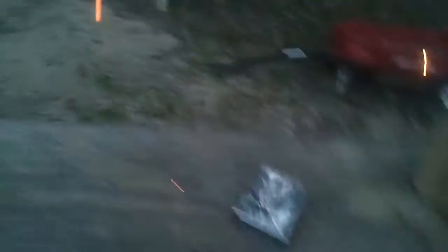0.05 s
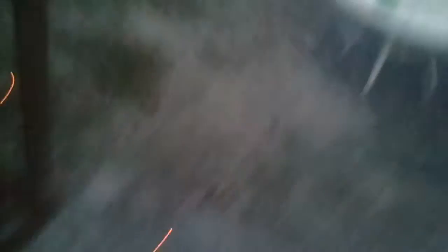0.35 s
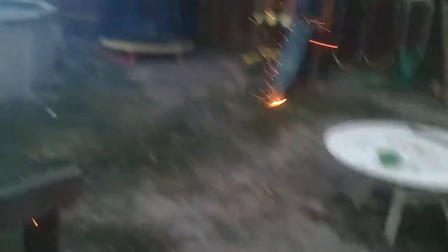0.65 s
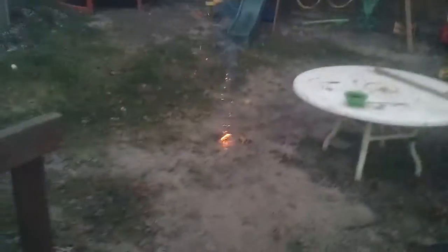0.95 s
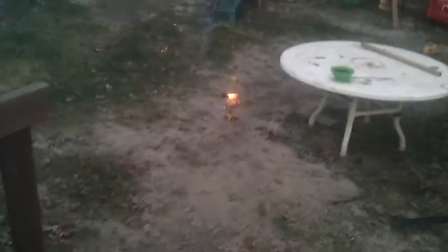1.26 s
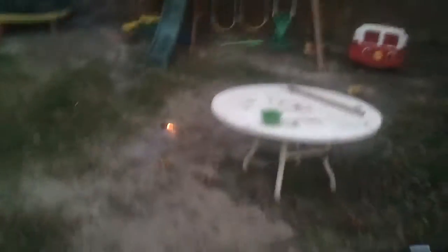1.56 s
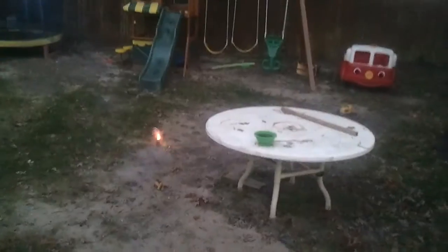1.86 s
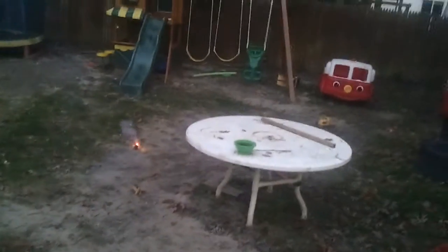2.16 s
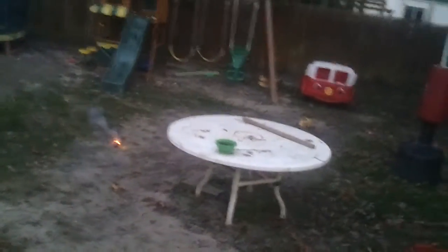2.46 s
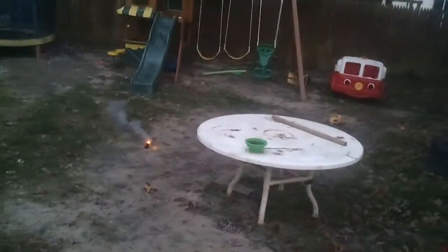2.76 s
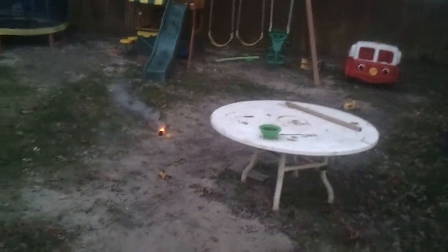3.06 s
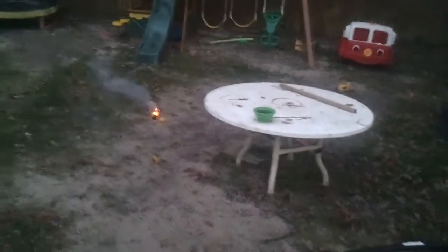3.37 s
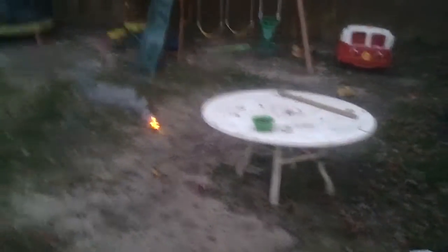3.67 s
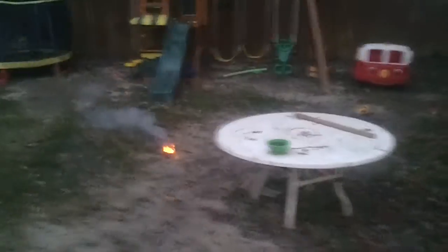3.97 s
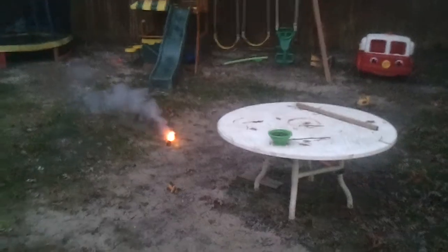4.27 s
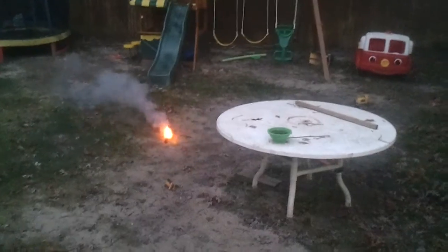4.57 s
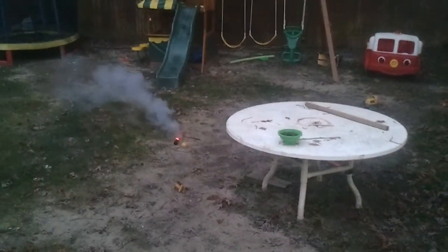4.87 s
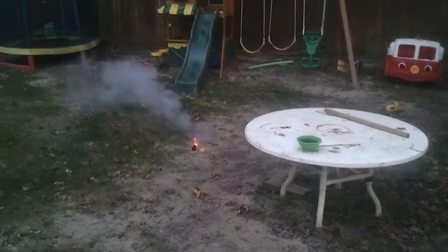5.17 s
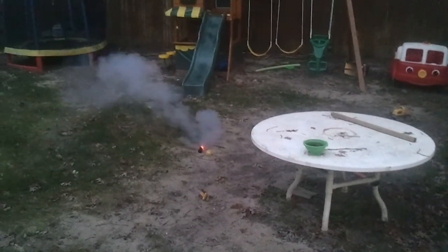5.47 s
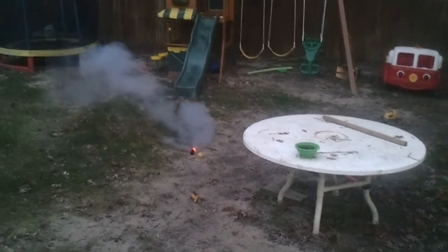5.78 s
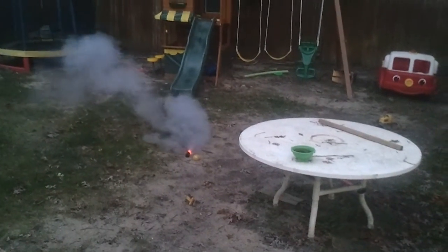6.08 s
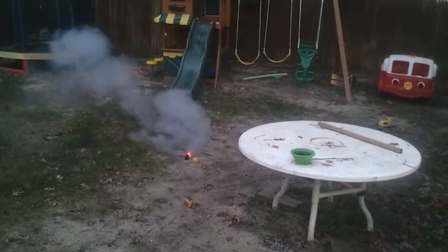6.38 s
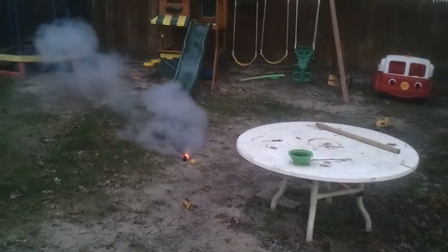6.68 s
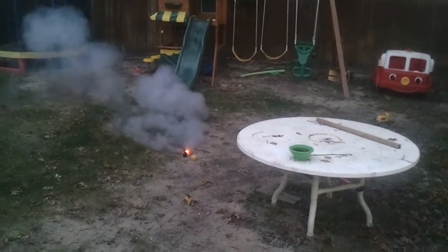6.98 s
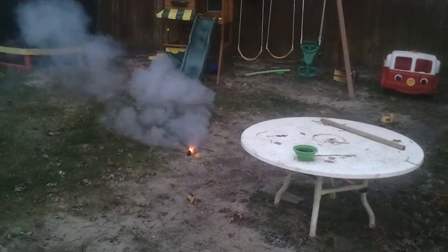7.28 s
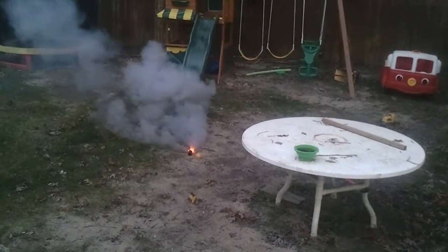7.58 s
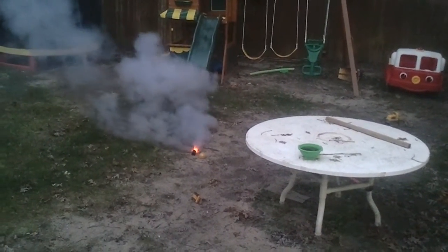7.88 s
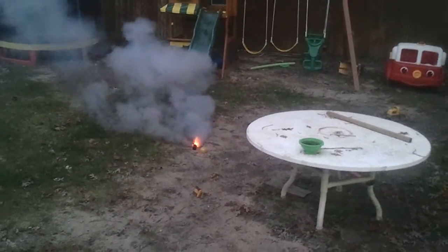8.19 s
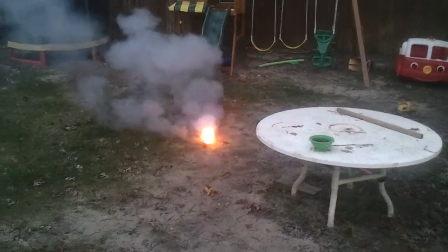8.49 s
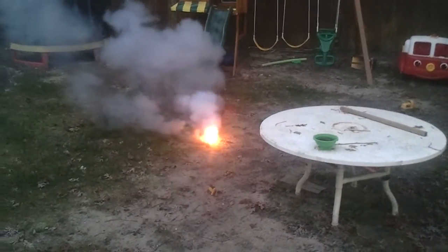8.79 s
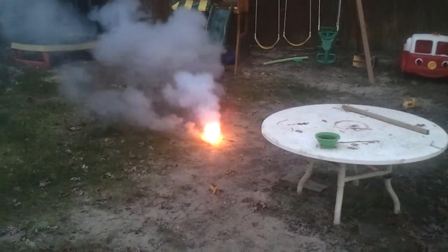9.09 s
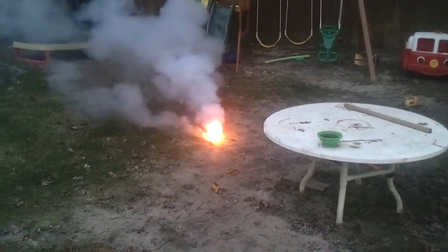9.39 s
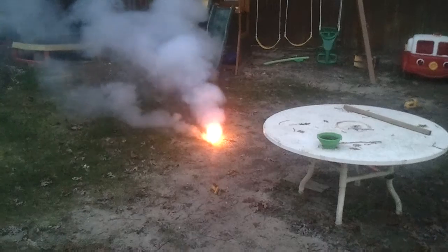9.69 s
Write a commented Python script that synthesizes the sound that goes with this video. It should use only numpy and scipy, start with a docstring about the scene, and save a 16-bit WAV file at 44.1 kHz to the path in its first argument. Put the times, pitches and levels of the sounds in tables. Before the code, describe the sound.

A fuse fizzes, fingers knock on the microphone, then a smoke bomb hisses loudly and settles into a soft flame as crickets trill.

```python
"""A homemade smoke device vents gas in a loud hiss as its charge catches, then settles into a flame.
Before that, its fuse fizzes past the camera and lands on the dirt, and the charge smoulders.
Fingers knock and rub on the camera body; the hardest knocks overload its microphone.
Crickets trill steadily in the backyard at dusk."""
import sys
import numpy as np
from scipy import signal
from scipy.fft import rfft, irfft
from scipy.io import wavfile
from scipy.ndimage import map_coordinates

SR = 44100
rng = np.random.default_rng(int(sys.argv[2]) if len(sys.argv) > 2 else 0)


def inscribe(sig):
    """Save sig as 16-bit PCM at rate SR to the path in sys.argv[1].

    A 1-D sig is mono; a 2-D sig holds one channel per row.
    Samples are clipped to [-1, 1] before scaling.
    """
    pcm = np.round(np.clip(np.atleast_2d(sig).T, -1, 1) * 32767)
    wavfile.write(sys.argv[1], SR, pcm.astype(np.int16))


N = 438354
TIME = np.arange(N) / SR


def amp(db):
    """Decibels to gain."""
    return 10 ** (np.asarray(db) / 20)


def unit(x):
    """Scale to rms 1."""
    return x / np.sqrt(np.mean(x ** 2) + 1e-20)


def curve(rows):
    """Breakpoints interpolated to every sample."""
    return np.interp(TIME, *np.transpose(rows))


def noise(spectrum):
    """Noise of rms 1 with the given spectral density, falling steeply above the last point."""
    hz = np.fft.rfftfreq(N, 1 / SR) + 1
    points_hz, db = np.transpose(spectrum)
    gain = amp(np.interp(np.log(hz), np.log(points_hz), db)) / (1 + (hz / points_hz[-1]) ** 20)
    return unit(irfft(rfft(rng.standard_normal(N)) * gain, N))


def flutter(rate_hz):
    """Random wavering of rms 1, rolling off above rate_hz."""
    hz = np.fft.rfftfreq(N, 1 / SR)
    gain = hz / (hz + 2) / (1 + (hz / rate_hz) ** 2)
    return unit(irfft(rfft(rng.standard_normal(N)) * gain, N))


def gate(start_s, attack_s, stop_s, release_s):
    """Linear attack, hold at 1, linear release."""
    return np.clip((TIME - start_s) / attack_s, 0, 1) * np.clip(1 - (TIME - stop_s) / release_s, 0, 1)


def swells(rows):
    """Gain of rounded, symmetric swells, summed in power."""
    return np.sqrt(sum((amp(db) / np.cosh(np.minimum(abs(TIME - peak_s) / width_s, 20))) ** 2
                       for peak_s, width_s, db in rows))


def ring(modes, t, rise_s=0.00028):
    """Damped modes struck at once, peak 1."""
    sound = sum(amp(db - 60 * t / t60_s) * np.sin(2 * np.pi * hz * t + k * np.pi / 2)
                for k, (hz, db, t60_s) in enumerate(modes))
    sound *= 1 - np.exp(-(t / rise_s) ** 2)
    return sound / abs(sound).max()


def add(mix, start_s, sound):
    """Mix a sound in at start_s."""
    part = mix[max(round(start_s * SR), 0):][:len(sound)]
    part += sound[:len(part)]


# Yard background: freq_hz, density_db
YARD_SPECTRUM = [(25, -25.5), (60, -7), (130, 0.5), (270, 2), (450, -2), (730, -3), (1100, -4),
                 (1900, -12.5), (2600, -4), (4500, 1), (6500, -22), (7700, -7), (9200, -41.5)]


def yard(level_db=-45):
    """Steady far-off background noise."""
    return amp(level_db) * noise(YARD_SPECTRUM)


# High insect song: freq_hz, density_db
TRILL_SPECTRUM = [(3700, -37), (4100, 1), (4400, 1), (4850, -0.5), (5200, -8), (5900, -15.5), (6500, -39.5)]
# Occasional trills: peak_s, width_s, level_db
TRILL_SWELLS = [(1.44, 0.043, -44), (1.93, 0.1, -30.5), (4.15, .5, -36.5)]


def high_insects(rasp_db=2):
    """Thin, rasping trills just above the crickets in pitch."""
    return noise(TRILL_SPECTRUM) * swells(TRILL_SWELLS) * amp(rasp_db * flutter(90))


# Cricket song: freq_hz, density_db
CRICKET_SPECTRUM = [(3200, -41), (3480, -20), (3660, -7), (3860, 2), (4000, -4), (4200, -10.5), (4600, -22),
                    (5000, -32.5), (5600, -44)]
# Chorus envelope: time_s, level_db
CHORUS_LEVEL = [(0, -32.5), (1.22, -36.5), (1.52, -26), (2.95, -26.2), (3.35, -23.5), (3.7, -27),
                (5, -25.3), (6.5, -26.5), (8.2, -24.7), (9.94, -26.5)]


def crickets(groups=8, mid_pulse_hz=42, pulse_depth=0.49, waver_db=0.46):
    """Trills blur into one shrill band, each group pulsing at its own wing-stroke rate."""
    chorus = np.zeros(N)
    for pace in rng.uniform(.5, 1.5, groups):
        strokes = np.cumsum(mid_pulse_hz * pace * (1 + .1 * flutter(3.3))) / SR
        chorus += noise(CRICKET_SPECTRUM) * (1 + pulse_depth * np.sin(2 * np.pi * strokes))
    return unit(chorus) * amp(curve(CHORUS_LEVEL) + waver_db * flutter(8.6))


# Finger scrape: freq_hz, density_db
SCRAPE_SPECTRUM = [(60, -22), (300, -7), (550, -1.5), (900, -4), (1600, -2.5), (2400, -5.5), (3300, -13.5),
                   (6000, -14), (9000, -44)]
# Slides on the case: start_s, length_s, level_db
FINGER_SLIDES = [(1.16, 0.084, -43.5), (1.368, 0.16, -44.5), (3.513, .1, -30), (3.68, .08, -42)]


def finger_scrape(attack_s=0.0078, release_s=.04, ease_db_per_s=41, grain_db=1.8):
    """Skin drags over plastic in a fine-grained scrape that eases off."""
    pressure = np.zeros(N)
    for start_s, length_s, level_db in FINGER_SLIDES:
        easing = amp(level_db - ease_db_per_s * np.maximum(TIME - start_s, 0))
        pressure += gate(start_s, attack_s, start_s + length_s, release_s) * easing
    grain = amp(grain_db * flutter(400))
    return noise(SCRAPE_SPECTRUM) * pressure * grain


# Upper modes of the plastic case: base_pitch_hz, relative_db, base_t60_s
CASE_MODES = [(3855, 5, 0.0052), (4250, 1, 0.0074), (4777, -2.5, 0.0084), (5430, -11.5, 0.01),
              (6760, -1, 0.003)]
# Lower case modes, heard as a crack: pitch_hz, relative_db, t60_s
CRACK_MODES = [(872, -8.5, 0.0069), (1160, -10, 0.0017), (1710, 6.5, 0.005), (2540, 13.5, 0.0022)]
# Knocks on the camera body: start_s, thud_db, thud_pitch_hz, crack_db, case_db
FINGER_KNOCKS = [ (0.015, -37, 900, -11, -5), (0.535, -15, 840, -25, -23), (0.5471, -14, 315, -12, -8),
                 (.629, -22, 755, -10, 0.5), (1.1569, -18, 695, -26, -21), (1.3259, -26, 260, -24, -32),
                 (1.473, -16, 315, -22, -37), (1.493, -13.5, 332, -13.5, -13.5),
                 (1.5989, -17, 540, -6.5, -8.5), (1.712, -26, 680, -5.5, -4), (1.8948, -21.5, 465, -11, -6),
                 (2.0487, -28.5, 500, -32, -39), (2.154, -27.5, 704, -38, -35),
                 (2.654, -33, 500, -26.5, -23), (3.1304, -23.5, 724, -23, -39),
                 (3.4813, -18, 342, -28, -43), (3.5059, -48, 900, -11.5, -14), (3.5212, -17, 440, -34, -30),
                 (3.668, -29.5, 230, -32, -15), (3.6983, -23.5, 420, -30, -38),
                 (3.9218, -22, 636, -12, -10.5), (3.9249, -5.5, 690, -15, -12),
                 (3.9503, -1.5, 675, -2.5, -2.5), (4.001, 0.5, 600, 1, -6.5),
                 (4.0569, -22.5, 900, -20, -32), (5.5899, -9, 560, -12, -1), (8.229, -9.5, 710, -9.5, -5.5),
                 (8.235, -34, 900, -11.5, -14)]


def knocks(thud_decay_cycles=0.52, hollow_db=-19, hollow_t60_s=.03, tightening_per_db=.011):
    """Damped thud, hollow after-ring, crack and case ring; stiffer spots ring more, and higher."""
    out = np.zeros(N)
    t = np.arange(SR // 20) / SR
    for start_s, thud_db, hz, crack_db, case_db in FINGER_KNOCKS:
        thud = np.sin(2 * np.pi * hz * t) * np.sqrt(t) * np.exp(-hz * t / thud_decay_cycles)
        hollow = amp(hollow_db) * ring([(.6 * hz, 0, hollow_t60_s), (1.3 * hz, 0, hollow_t60_s)], t)
        add(out, start_s - .0006, amp(thud_db) * (thud / abs(thud).max() + hollow))
        pitch_ratio = np.exp(tightening_per_db * (case_db - crack_db))
        crack = amp(crack_db) * ring(CRACK_MODES, t)
        case = amp(case_db) * ring(CASE_MODES, t * pitch_ratio)
        add(out, start_s - .0004, crack + case)
    # The small case radiates little deep bass and no top treble.
    out = signal.sosfilt(signal.butter(2, 150, "high", fs=SR, output="sos"), out)
    return signal.sosfilt(signal.butter(10, 7600, fs=SR, output="sos"), out)


# Fingertip settling: freq_hz, density_db
RUSTLE_SPECTRUM = [(60, -18), (260, 0), (750, -4), (1500, -15.5)]


def finger_rustle(base_db=-32, growth=0.27, rise_s=0.0032, fade_s=0.015):
    """The fingertip settles after each knock; harder thuds leave a stronger rustle."""
    gain = np.zeros(N)
    t = np.arange(SR // 5) / SR
    envelope = (1 - np.exp(-(t / rise_s) ** 2)) * np.exp(-t / fade_s)
    for start_s, thud_db, *_ in FINGER_KNOCKS:
        add(gain, start_s, amp(base_db + growth * thud_db) * envelope)
    return noise(RUSTLE_SPECTRUM) * gain


# Fuse puffs at close range: peak_s, width_s, level_db
FUSE_PUFFS = [(.13, 0.024, -22.5), (.19, 0.042, -16), (.36, 0.045, -22.5), (.48, 0.013, -37)]


def fuse_gain(near_db=-21.5, near_m=.3, throw_s=0.49, flight_s=0.56, speed_m_per_s=6.8):
    """The fuse burns with a few puffs, fades with distance once thrown, and goes out."""
    out_s, fade_s = 1.5, .2
    alight = np.clip(1 - (TIME - out_s) / fade_s, 0, 1)
    distance_m = near_m + speed_m_per_s * np.clip(TIME - throw_s, 0, flight_s)
    return np.hypot(amp(near_db), swells(FUSE_PUFFS)) * alight * near_m / distance_m


# Fuse fizz: freq_hz, density_db
FIZZ_SPECTRUM = [(25, -19.5), (70, -27), (250, -20), (800, -13), (1400, -6), (2000, -13), (2800, -7),
                 (3600, -3), (4500, -2), (5500, -6), (7000, -13.5), (8200, -18), (9200, -56)]
# Echo off the deck as the fuse swings: time_s, lag_ms
DECK_ECHO_LAG = [(0, 0.438), (.2, .44), (.3, 0.32), (.39, .28), (.46, 0.395), (.75, 0.474)]


def fuse(sputter_db=1.5, echo_gain=.58):
    """Sputtering fizz; its echo off the deck sweeps a comb through it as it moves."""
    fizz = noise(FIZZ_SPECTRUM) * amp(sputter_db * flutter(130))
    echo_index = np.arange(N) - curve(DECK_ECHO_LAG) * SR / 1000
    echo = echo_gain * map_coordinates(fizz, [echo_index], order=3)
    return unit(fizz + echo) * fuse_gain()


# Vent edge tones: pitch_hz, relative_db
WHISTLE_TONES = [(5480, -1.5), (6800, -14.5)]
# Whistles under the flame: peak_s, width_s, level_db
WHISTLE_SWELLS = [(8.66, 0.11, -44), (9.38, .08, -45)]


def whistle(waver_hz=45, unsteady_db=3):
    """Faint, unsteady edge tones at the burning vent."""
    tones = sum(amp(db) * np.sin(2 * np.pi * np.cumsum(hz + waver_hz * flutter(90)) / SR)
                for hz, db in WHISTLE_TONES)
    return unit(tones) * swells(WHISTLE_SWELLS) * amp(unsteady_db * flutter(30))


# Open flame: freq_hz, density_db
FLAME_SPECTRUM = [(30, -28.5), (90, -18), (190, -1.5), (330, -3.5), (440, -8.5), (580, 0), (850, -2.5),
                  (1200, -5), (1800, -22), (2900, -2), (5400, -9), (6800, -9), (9000, -46)]


def flame(full_db=-37.5, full_s=8.79, rise_db_per_s=9, flicker_db=0.84):
    """The open flame grows to a soft, flickering roar."""
    level_db = full_db + rise_db_per_s * np.minimum(TIME - full_s, 0)
    return noise(FLAME_SPECTRUM) * amp(level_db + flicker_db * flutter(25))


# Echoes off ground, table and deck rail: lag_ms, gain
REFLECTIONS = [(1.29, 0.032), (5.72, 0.053), (13.3, 0.039), (17.75, 0.042)]


def reflected(x):
    """Direct sound plus early reflections."""
    return x + sum(gain * np.roll(x, round(lag_ms * SR / 1000)) for lag_ms, gain in REFLECTIONS)


# Jet surges, strongest as the charge flares: peak_s, width_s, strength_db
JET_SURGES = [(.92, 0.11, -44.5), (1.44, 0.032, -38), (4.85, .35, -43.5), (5.35, 0.04, -12),
              (5.63, 0.1, -24), (6.12, 0.16, -27)]


def jet_strength_db(catch_s=5.024, build_s=0.26, sag_s=1.57, flame_s=8.38, drop_s=0.19):
    """The charge smoulders and catches; its pressure sags, then drops as the flame breaks out."""
    smoulder_db, smoulder_db_per_s = -42, 1.95
    steady_db, overpressure_db = -35, 16
    age_s = TIME - catch_s
    smoulder = amp(smoulder_db + smoulder_db_per_s * np.minimum(age_s, 0))
    burn = amp(steady_db + overpressure_db * np.exp(-np.maximum(age_s, 0) / sag_s))
    burn *= gate(catch_s, build_s, flame_s, drop_s)
    return 10 * np.log10(smoulder ** 2 + burn ** 2 + swells(JET_SURGES) ** 2)


# Sharp hiss at the vent: freq_hz, density_db
HISS_SPECTRUM = [(2000, -31), (3200, -14.5), (3700, -4), (4200, -0.5), (4600, -1.5), (5000, -6),
                 (5600, -12), (6300, -17), (7200, -21), (8200, -39.5), (9200, -62)]
# Broad rush of the plume: freq_hz, density_db
RUSH_SPECTRUM = [(30, -27.5), (100, -20.5), (220, -4), (430, -4.5), (640, 4), (980, -1.5), (1600, 1.5),
                 (1900, -0.5), (2400, 6), (3000, -1.5), (4400, -6.5), (7000, -11), (8300, -15), (9200, -51)]


def jet(hiss_offset_db=3, hiss_growth=0.95, rush_offset_db=-15, rush_growth=0.69, sputter_db=1.0):
    """Gas leaves the vent; the hiss grows faster with pressure than the rush."""
    strength_db = jet_strength_db() + sputter_db * flutter(52)
    hiss = noise(HISS_SPECTRUM) * amp(hiss_offset_db + hiss_growth * strength_db)
    rush = noise(RUSH_SPECTRUM) * amp(rush_offset_db + rush_growth * strength_db)
    return hiss + rush


def scene():
    """Mono mix of device, yard and handling."""
    device = fuse() + reflected(jet() + flame()) + whistle()
    outdoors = crickets() + high_insects() + yard()
    handling = knocks() + finger_rustle() + finger_scrape()
    return (device + outdoors + handling)[None]


def record(dry):
    """Microphone: tight-knee overload, dulled top, band limit."""
    ceiling, knee, cutoff_hz = .75, 30, 16000
    clipped = dry / (1 + (dry / ceiling) ** knee) ** (1 / knee)
    dulled = signal.convolve(clipped, [[-.04, .16, .76, .16, -.04]], "same")
    lowpass = signal.firwin(255, cutoff_hz, window=("kaiser", 9), fs=SR)
    return signal.oaconvolve(dulled, lowpass[None], "same")


dry = scene()
out = record(dry)
inscribe(out)
```